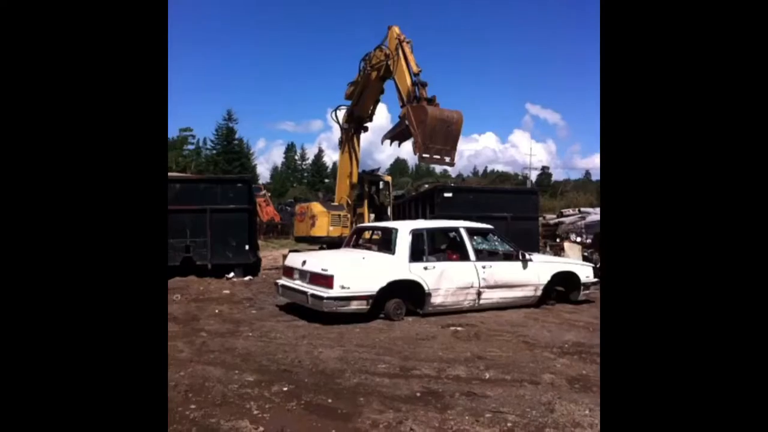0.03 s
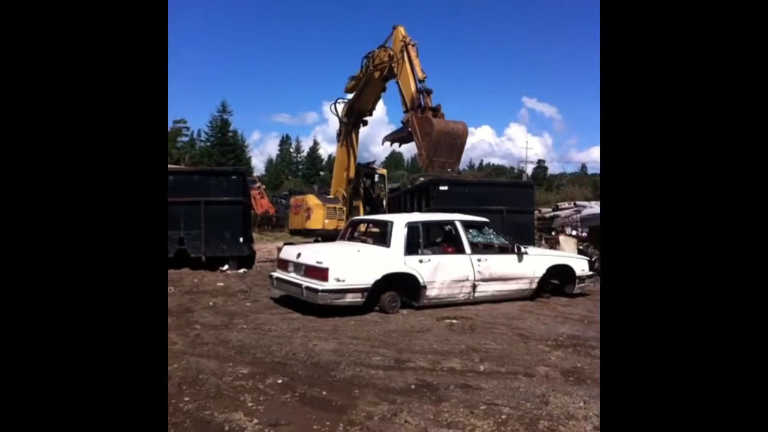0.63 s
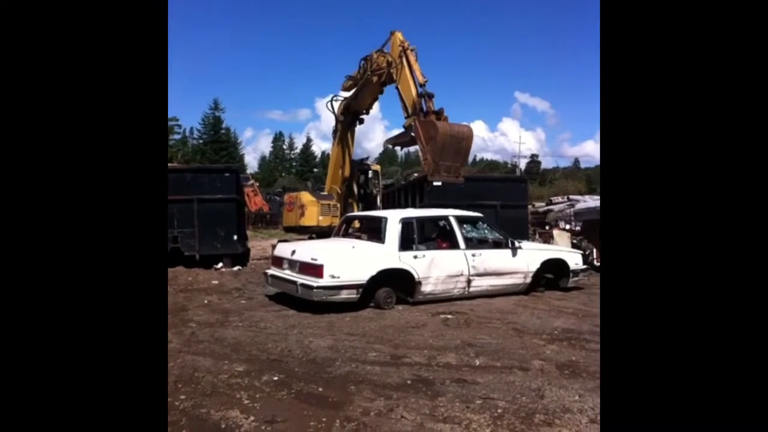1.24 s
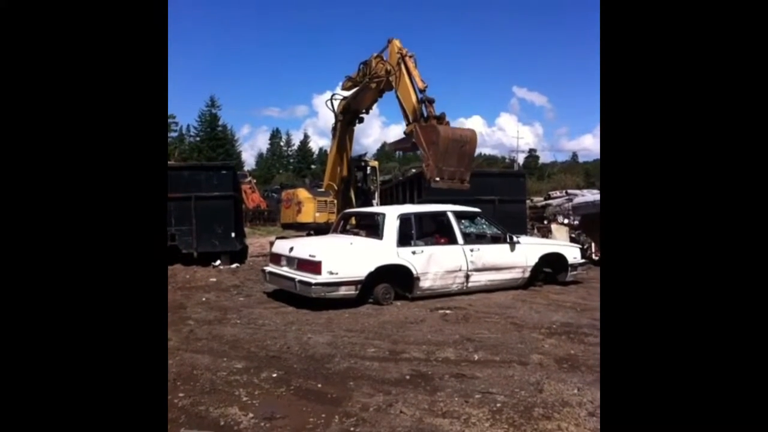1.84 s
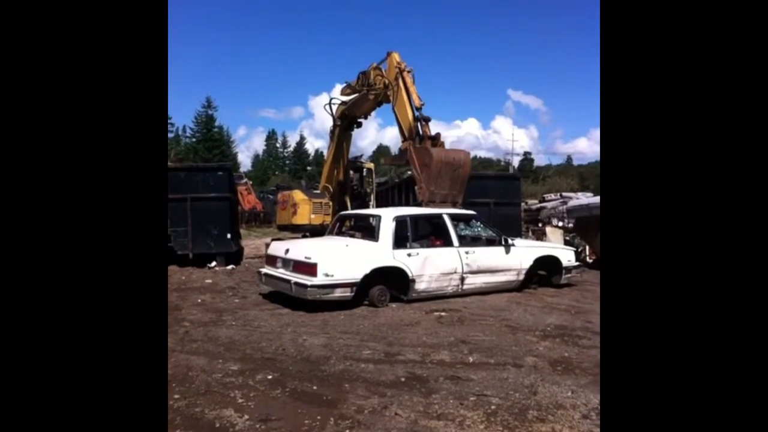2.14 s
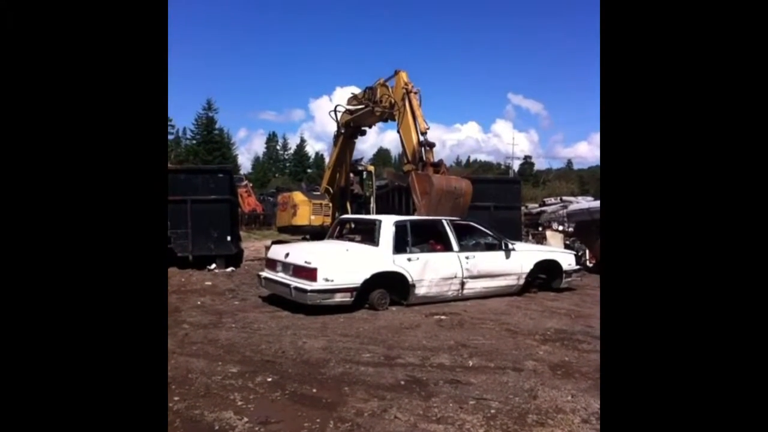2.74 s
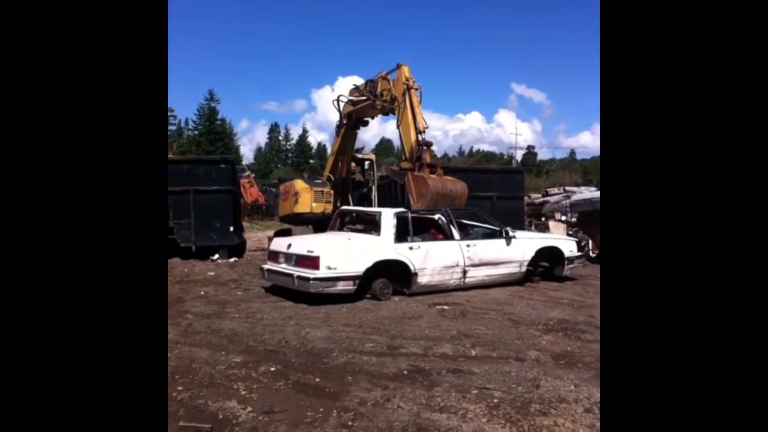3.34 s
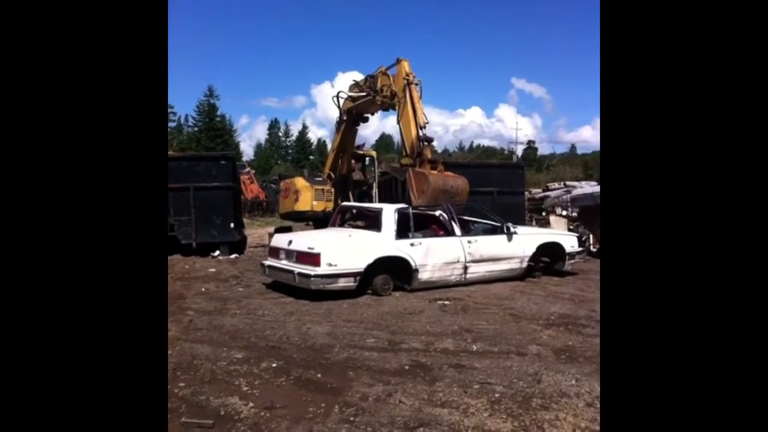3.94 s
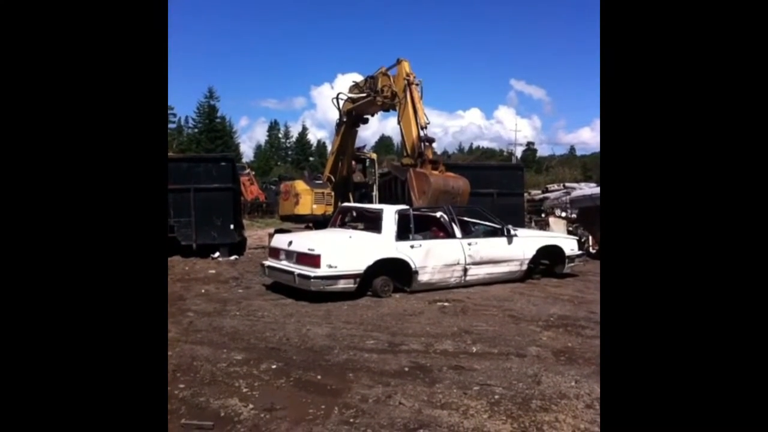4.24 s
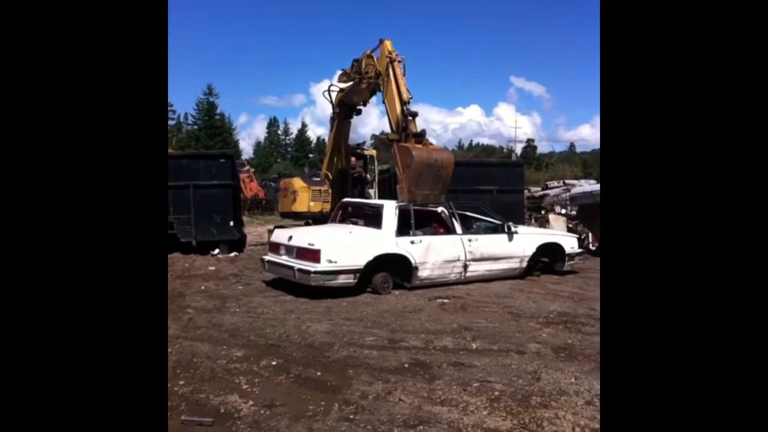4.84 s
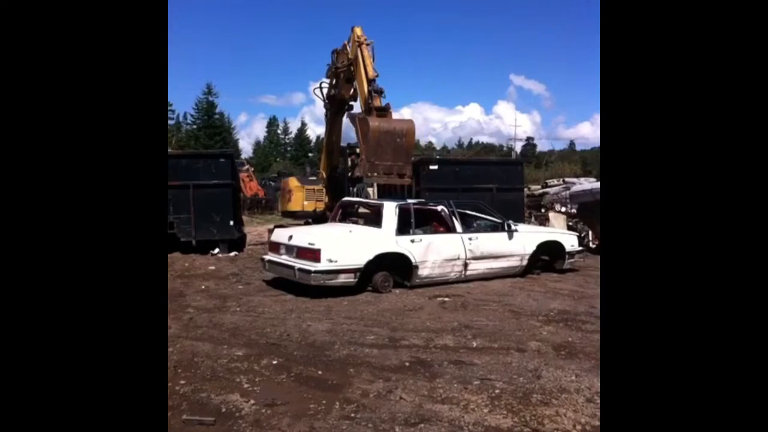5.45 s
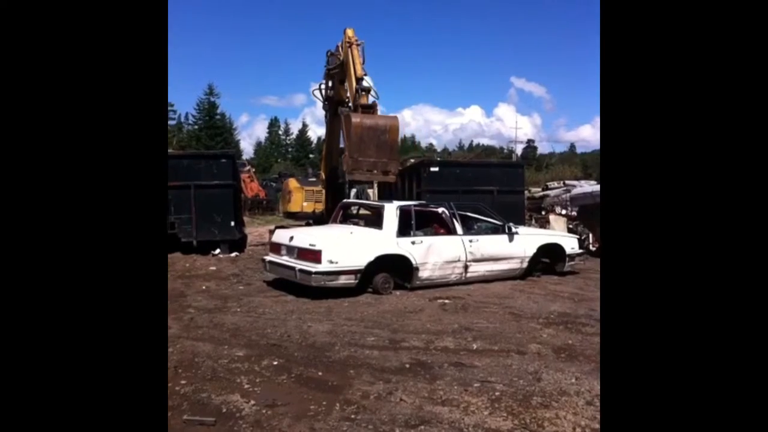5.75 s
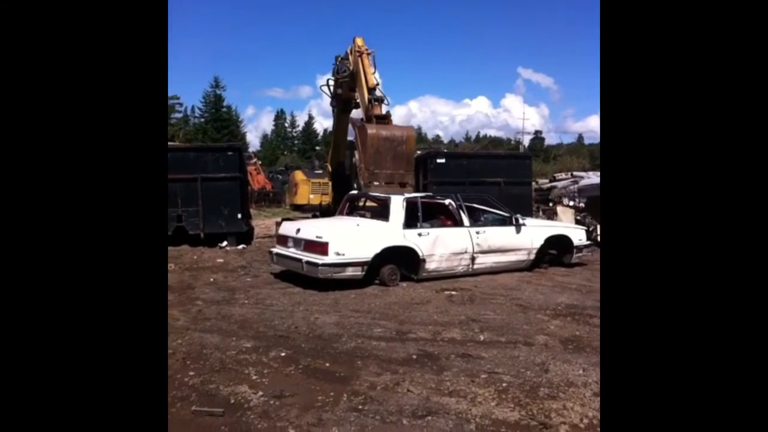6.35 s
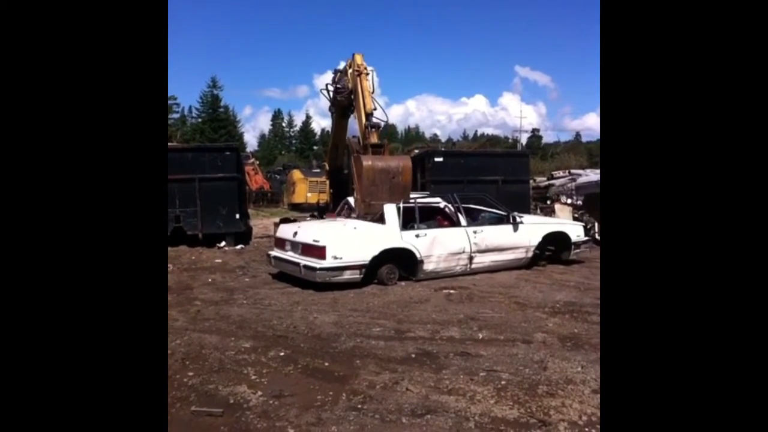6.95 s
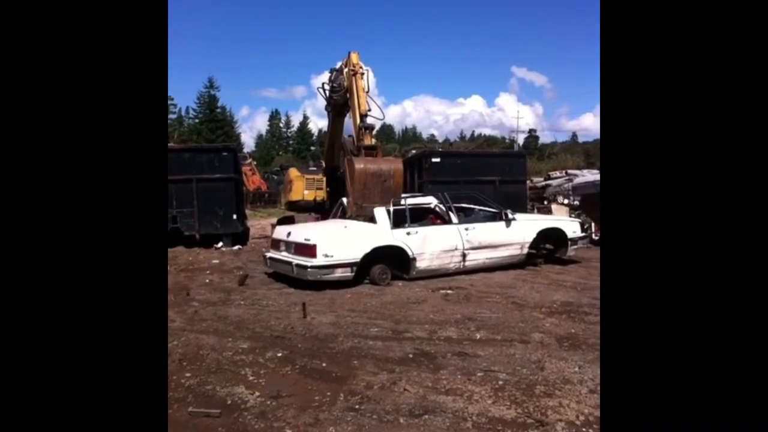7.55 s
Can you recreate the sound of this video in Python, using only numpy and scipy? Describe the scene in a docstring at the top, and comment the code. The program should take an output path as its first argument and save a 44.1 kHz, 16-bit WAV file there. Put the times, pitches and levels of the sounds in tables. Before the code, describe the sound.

Metal crunches, creaks and booms and glass splinters as an excavator bucket presses twice into a car roof, over a steady diesel drone.

```python
"""A diesel drones and hisses: an excavator in a scrap yard, oil whistling thinly in its valves.
Its bucket presses into a car's roof, lifts and presses again. In bursts of tiny slips the sheet buckles
and booms, and trim and glass snap and splinter. Panels creak; the bucket clunks, clanks over a pillar
and scrapes along torn metal. The camera's limiter pulls everything down after the sharpest cracks
and lets it swell back."""
import sys
import numpy as np
from scipy import signal
from scipy.io import wavfile
from scipy.ndimage import uniform_filter1d, minimum_filter1d

SR = 44100
rng = np.random.default_rng(int(sys.argv[2]) if len(sys.argv) > 2 else 0)


def master(y):
    """Save y as 16-bit WAV."""
    cut = np.clip(np.atleast_2d(y).T, -1, 1)
    pcm = np.round(cut * 32767)  # scale
    wavfile.write(sys.argv[1], SR, pcm.astype(np.int16))


N = 335160
TIME = np.arange(N) / SR

# Glass, trim and welds giving way, and at 4.383 s the bucket's bright rasp as it clunks; sheet folding. Both:
# (time [s], peak [dB], thud [dB], splinters [dB], ring [Hz], decay [s], ring [dB])
SNAPS = [(2.215, -11.5, 1, -4, 660, 0.0048, 2), (2.328, -12.5, -20, -3, 670, 0.0033, 10),
         (2.491, -13.5, -16, 16, 735, 0.0037, 0), (2.577, -14.5, 6, 0, 820, 0.0065, 3),
         (2.9255, -9.5, -8, -3, 1480, 0.0025, 6), (2.9567, -10, 2, -2, 1340, 0.004, 2),
         (2.992, -17, -2, -15, 1500, 0.0077, -4), (3.03, -3.5, -7, 3, 1350, 0.0061, 3),
         (3.1094, 0, -15, -4.5, 1530, 0.0031, 3), (3.1796, -9, -29, -17, 1620, 0.0026, 8),
         (3.192, -8, -4.5, -5.5, 1320, 0.0027, -1), (3.3243, 11, -14.5, -0.5, 1590, 0.0022, -2),
         (3.559, -5.5, -5, 1.5, 1370, 0.01, 5), (3.935, -17.5, -12.5, 5, 1380, 0.0064, -1),
         (3.964, -20, -10, 12, 1398, 0.0046, 0), (4.12, -17, -10, 0, 1398, 0.0051, 0),
         (4.383, -17.5, -7, -2.5, 1400, 0.02, -5), (4.421, -29, -15, 17, 1400, 0.012, -3),
         (6.472, -22.5, -7, -3, 696, 0.0038, 15), (6.57, -17.5, -16, -14, 670, 0.003, 16),
         (6.626, -16, 7, -4, 620, 0.002, 12), (6.7072, -16, -16, -8, 2050, 0.0046, -1),
         (6.7698, -9, -16, -3, 2050, 0.0039, 2), (6.847, 1.5, -23, 8, 2440, 0.0046, -5),
         (6.87, -9, -24, 14.5, 1270, 0.023, 3), (6.935, -11, -5, 0, 729, 0.0051, 6),
         (7.3698, -5, -23, 4, 2100, 0.0038, -1)]
BUCKLES = [(2.246, -4, -1, -27, 790, 0.0051, -6), (2.2905, -11.5, -1, -24, 730, 0.014, 1),
           (2.3166, -10, -7, -23, 1290, 0.0063, 5), (2.353, -1.5, -8, -16, 610, 0.01, 2.5),
           (2.37, -9.5, -18, -10, 740, 0.0071, 6), (2.4431, -9, -19, -10, 1720, 0.0065, 11),
           (2.539, -5.5, -3.5, -9, 680, 0.023, -2), (2.7048, -11, -6, -25, 1620, 0.007, 10),
           (2.765, 1.5, 2, -3.5, 1900, 0.0092, -8), (2.7999, -9.5, -9, -17, 1660, 0.0094, 4),
           (2.8525, 0, -2, -8.5, 1520, 0.0061, -5), (4.57, -13, -4, -15, 1420, 0.017, -7),
           (4.641, -5.5, -6, -22, 1850, 0.004, 6), (4.765, -6.5, -8, -14, 1970, 0.007, -14),
           (4.783, -4.5, -11, -23, 1990, 0.008, 3), (4.9004, -14.5, 0, -18, 2120, 0.019, 4),
           (6.8825, -6.5, -21, 1, 2000, 0.0052, 6), (6.905, -11, -12, -10, 1300, 0.01, 2),
           (6.959, -10.5, -10, -27, 706, 0.031, -7), (7.57, -10.5, -6, -9.5, 1670, 0.012, -1)]

def cracks():
    """Brittle parts snap short and bright; sheet metal buckles slower and duller."""
    out = np.zeros(N)
    for time_s, *row in SNAPS:
        add(out, time_s, fracture(*row, rise_s=0.000095, highpass_hz=1140, ring_t60_s=0.016,
                                  shell_db=-18, trim_db=-5, thud_stretch=15, tail_db=-22))
    for time_s, *row in BUCKLES:
        add(out, time_s, fracture(*row, rise_s=0.0012, highpass_hz=150, ring_t60_s=0.039,
                                  shell_db=-5.5, trim_db=0.5, thud_stretch=1, tail_db=-38))
    return out


# Modes of the car's shell; of a trim strip or shard: (frequency [Hz], level [dB], t60 [s])
SHELL_MODES = [(160, -24, .12), (232, -12, .1), (275, -20, 0.079), (388, 6, 0.12), (595.3, 8, 0.23),
               (662, 11, 0.064), (744, 10, 0.11), (844, 8, 0.071), (1160, 10, 0.13), (1337, 5, 0.07),
               (1678, 0.5, 0.089), (1965, 12.5, 0.057), (2206, 9.5, 0.06)]
TRIM_MODES = [(2090, -3.5, 0.034), (2660, -1.5, 0.044), (3100, 1, 0.02), (4265, 4, 0.019),
              (5260, -4.5, .025), (5910, -2.5, 0.027), (6780, -2.5, 0.015), (7430, -6.5, 0.028)]
# Spectra of flexing panels, tearing sheet, splintering glass: (frequency [Hz], gain [dB])
BOOM_SPECTRUM = [(30, -38), (85, -29.5), (150, -2.5), (250, -1), (350, -5), (450, -11), (900, -43.5),
                 (3000, -64)]
TEAR_SPECTRUM = [(100, -19), (350, -27), (620, 9), (850, 7.5), (1020, -1), (1250, 3.5), (1700, 2),
                 (2200, -6.5), (2900, -11.5), (4500, -17), (15000, -73)]
GLASS_SPECTRUM = [(800, -70), (2200, 4), (3300, -6), (4300, 2), (6300, 0.5), (8000, -4), (9300, -2.5),
                  (11000, -6), (15000, -7)]

def fracture(peak_db, thud_db, splinter_db, ring_hz, decay_s, ring_db,
             rise_s, highpass_hz, ring_t60_s, shell_db, trim_db, thud_stretch, tail_db, size=11000):
    """A dying avalanche of slips tears and rings the sheet, shoves a panel and throws splinters."""
    t = np.arange(size) / SR
    slips, shove, chips = rng.choice([-1., 1.], (3, size))
    burst = (1 - np.exp(-t / rise_s)) * (np.exp(-t / decay_s) + amp(tail_db) * np.exp(-t / 0.0038))
    heave = (1 - np.exp(-t / 0.0036)) * np.exp(-t / (thud_stretch * decay_s))
    slips, chips = slips * burst, chips * burst
    torn = unit(highpass(colour(slips, TEAR_SPECTRUM), highpass_hz))  # small pieces radiate little bass
    patch = amp(ring_db) * unit(ring(slips, [(ring_hz, 0, ring_t60_s)]))
    shell = amp(shell_db) * unit(ring(slips, SHELL_MODES))
    piece_modes = [(hz * (1 + 0.044 * rng.uniform(-1.28, 1)), db, t60) for hz, db, t60 in TRIM_MODES]
    trim = amp(trim_db) * unit(ring(chips, piece_modes))
    splinters = amp(splinter_db) * unit(unit(colour(chips, GLASS_SPECTRUM)) + trim)
    thud = amp(thud_db) * unit(colour(shove * heave, BOOM_SPECTRUM))
    return at_peak(unit(torn + patch + shell) + thud + splinters, peak_db)


# Arm strokes: (start [s], length [s], rise [s], boom [dB], crumpling [dB], glass [dB])
STROKES = [(2.215, 0.26, 0.022, -30.5, -24, -34.5), (2.261, 0.056, 0.0099, -17.5, -23, -48),
           (2.44, 0.3, 0.025, -30.5, -28, -37), (2.768, 0.17, 0.024, -27.5, -26, -34),
           (2.962, 0.21, 0.016, -31.5, -26, -30.5), (3.234, 0.094, 0.058, -46, -42, -32.5),
           (3.348, 0.38, 0.022, -35, -38, -39), (3.946, 0.19, 0.042, -33, -40, -41.5),
           (4.536, 0.29, 0.015, -27, -24.5, -40.5), (6.464, 0.38, 0.086, -40, -35.5, -42),
           (6.787, 0.093, 0.055, -27, -27.5, -27), (6.968, 0.28, 0.022, -28, -29.5, -34),
           (7.406, 0.28, 0.025, -35.5, -34.5, -39.5)]
# Crumbs after a 0 dB crack, for panels, sheet and glass: (level [dB], decay [s])
CRUMBS = [(-21, 0.05), (-25, 0.027), (-28, 0.046)]

def grinding_gains(swell_db_per_s=6, release_db_per_s=120, reference_decay_s=0.0083):
    """Pressure builds, swells slowly while held and drops fast when let go; longer cracks shed more crumbs."""
    power = np.zeros((3, N))
    for start_s, length_s, rise_s, *levels_db in STROKES:
        t = TIME - start_s
        fall_db = swell_db_per_s * np.maximum(t, 0) - release_db_per_s * np.maximum(t - length_s, 0)
        effort = np.clip(t / rise_s, 0, 1) * amp(fall_db)
        power += (amp(levels_db)[:, None] * effort) ** 2
    t = np.arange(SR // 2) / SR
    for time_s, peak_db, thud_db, splinter_db, _, decay_s, _ in SNAPS + BUCKLES:
        for layer, share_db, (crumb_db, fade_s) in zip(power, (thud_db, 0, splinter_db), CRUMBS):
            gain = amp(peak_db + share_db + crumb_db) * decay_s / reference_decay_s
            add(layer, time_s, (gain * np.exp(-t / fade_s)) ** 2)
    return np.sqrt(power)


def crushing(shell_db=-4, uneven_db=0.4, spray_db=-7, spray_s=0.0049):
    """Small slips stream through the panels, the creasing sheet and the crazed glass."""
    boom_gain, crumple_gain, glass_gain = grinding_gains()
    creases = grains(per_s=1500, spread_db=2)
    shell = amp(shell_db) * unit(ring(creases, SHELL_MODES[4:]))
    metal = unit(unit(colour(creases, TEAR_SPECTRUM)) + shell)
    panels = unit(colour(rng.standard_normal(N), BOOM_SPECTRUM))
    splinters = unit(colour(grains(per_s=10000, spread_db=-4), GLASS_SPECTRUM) * amp(0.43 * drift(170)))
    # Larger shards release short sprays.
    shards = abs(grains(per_s=52, spread_db=5.5))
    sprays = signal.lfilter([1], [1, -np.exp(-1 / (spray_s * SR))], shards)
    splinters = unit(splinters * (1 + amp(spray_db) * unit(sprays)))
    return (panels * boom_gain + metal * crumple_gain + splinters * glass_gain) * amp(uneven_db * drift(25))


# Groans and squeals: (centre [s], length [s], level [dB], pitch [Hz], wobble [ratio], glide [octaves])
CREAKS = [(0.316, 0.1, -34, 345.5, 0.14, -0.023), (2.256, 0.043, -17.5, 203, 0.15, 0.11),
          (2.3, 0.089, -22, 162.7, 0.07, -0.019), (2.303, 0.049, -19, 723, 0.09, 0.11),
          (2.37, .04, -21, 623, 0, 0.02), (2.36, 0.022, -16, 1124, 0, -0.18),
          (2.777, 0.03, -14, 284, 0, -0.37), (2.843, 0.021, -13.5, 254, 0.06, 0),
          (2.864, 0.02, -7.5, 314, .03, -0.13), (4.55, .016, -33, 6660, .03, -0.088),
          (4.645, .014, -15, 1860, 0, -0.08), (4.79, 0.043, -23, 2090, 0.1, -0.12),
          (6.597, 0.11, -28, 228, 0.13, 0.046), (6.821, .028, -21.5, 291, 0, 0.092),
          (6.844, 0.0243, -26, 750, .08, 0.24), (6.847, 0.039, -22.5, 1140, 0.05, 0.22),
          (6.873, .03, -23, 1400, .05, 0.2), (6.887, 0.013, -8.5, 1243, 0.02, 0.055),
          (6.905, 0.01, -17, 1280, 0.14, -0.062), (6.918, 0.01, -21, 1260, 0.08, -0.069),
          (7.193, 0.077, -21, 211, 0.11, -0.14)]

def creaks(rough_db=3, slips_per_cycle=0.33):
    """Stick-slip tones glide with the tension; pitch and strength shift with every slip."""
    out = np.zeros(N)
    for centre_s, length_s, db, hz, wobble, glide_octaves in CREAKS:
        active = abs(TIME - centre_s) < length_s / 2
        t = TIME[active] - centre_s
        slip_count = (t + length_s / 2) * hz * slips_per_cycle
        bend, grip = (np.interp(slip_count, np.arange(512), k) for k in rng.standard_normal((2, 512)))
        pitch_hz = hz * 2 ** (glide_octaves * t / length_s) * (1 + wobble * bend)
        tone = amp(rough_db * grip) * np.sin(2 * np.pi * np.cumsum(pitch_hz) / SR)
        out[active] += amp(db) * unit(tone) * np.cos(np.pi * t / length_s)
    return out


# Teeth skipping over a pillar; arm slack knocking the bucket: (time [s], peak [dB], decay [s])
CLANKS = [(7.1359, -7, 0.0018), (7.2222, -6.5, 0.0051), (7.2328, -4, 0.0019), (7.2583, -5, 0.0031)]
CLUNKS = [(1.56, -25, 0.062), (4.388, -6, 0.01), (4.399, -3, 0.016), (4.781, -31, 0.021),
          (5.64, -29, 0.033), (5.74, -22.5, 0.027), (6.598, -15.5, 0.0076)]
# Modes of the pillar; of the hollow bucket: (frequency [Hz], level [dB], t60 [s])
PILLAR_MODES = [(1790, 7.5, 0.019), (2134, 10, 0.03), (2700, -5, 0.017), (4130, -1, 0.024),
                (5400, -10, .012), (6030, -3, 0.02), (7760, -20, 0.014)]
BUCKET_MODES = [(270, -18, 0.091), (358, 5, 0.11), (480, 2.5, 0.078), (580, 9.5, 0.063), (830, 3, 0.12),
                (896, 4, 0.061), (990, -1.5, 0.035), (1120, 7, 0.088), (1233, 2, 0.053), (1346, 9, 0.03),
                (1480, -7, 0.036), (1730, -4, 0.06), (1890, -3, 0.06), (2160, -16, 0.055)]

def blows(rows, modes, rise_s, rasp_db, thud_db=-17, size=11000):
    """Steel chatters briefly on steel, rings the struck part and shoves its walls."""
    t, out = np.arange(size) / SR, np.zeros(N)
    for time_s, peak_db, decay_s in rows:
        chatter = rng.standard_normal(size) * (1 - np.exp(-t / rise_s)) * np.exp(-t / decay_s)
        rasp = amp(rasp_db) * unit(colour(chatter, TEAR_SPECTRUM))
        thud = amp(thud_db) * unit(colour(chatter, BOOM_SPECTRUM))
        add(out, time_s, at_peak(unit(ring(chatter, modes)) + rasp + thud, peak_db))
    return out


# Lip drags: (start [s], length [s], rise [s], level [dB], pitch [ratio], tilt [dB/octave])
SCRAPES = [(2.384, 0.044, 0.0075, -22, 1.0, -2), (2.647, 0.071, 0.012, -24, 1.02, 0.5),
           (4.605, 0.047, 0.021, -22, .9, -1), (4.71, 0.04, .005, -28.5, .99, 7),
           (4.765, 0.039, .015, -18.5, 1.0, -5.5), (6.966, 0.019, .008, -24, .76, -3)]
# Modes of the torn edge: (frequency [Hz], level [dB], t60 [s])
EDGE_MODES = [(1415, 1, 0.02), (1740, 1, 0.024), (2030, -5.5, 0.067), (2240, -9, 0.033), (2950, -7, 0.016),
              (3590, -7, 0.031), (4300, -7.5, 0.027), (5600, -9, 0.022)]

def scrapes(release_db_per_s=700, wobble=0.0393, size=11000):
    """The bucket's lip judders along a torn edge and rings it; the pitch wobbles with the tension."""
    t, out = np.arange(size) / SR, np.zeros(N)
    slips, tension = grains(per_s=2500, spread_db=3), drift(160)
    for start_s, length_s, rise_s, db, pitch, tilt_db in SCRAPES:
        span = slice(round(start_s * SR), round(start_s * SR) + size)
        modes = [(hz * pitch, mode_db + tilt_db * np.log2(hz), t60) for hz, mode_db, t60 in EDGE_MODES]
        judder = np.clip(1 + wobble * tension[span], .5, 2)
        screech = np.interp(np.cumsum(judder), np.arange(size), unit(ring(slips[span], modes)))
        envelope = np.minimum(t / rise_s, 1) * amp(db - release_db_per_s * np.maximum(t - length_s, 0))
        add(out, start_s, screech * envelope)
    return out


# Governed speed: (time [s], firing rate [Hz])
FIRING_RATE = [(0, 61), (.45, 61.3), (.8, 60.4), (1.25, 60), (2, 60.8), (2.5, 61.3), (3, 59.7), (3.5, 60.3),
               (3.75, 60.9), (4.1, 60.2), (5.25, 60.45), (6.1, 60.05), (6.6, 60.9), (7, 60), (7.6, 60.1)]
# Engine load: (time [s], exhaust gain [dB], clatter, knock and hiss gain [dB])
ENGINE_LOAD = [(0, -5, 0.5), (.6, -2.5, -0.5), (1.2, -1, 0), (2.1, -3.5, -1), (2.7, 0.5, -1.5), (3.5, 4, 7),
               (4.2, 6.5, 7), (5, 1.5, 0.5), (6.2, -0.5, -1), (6.9, -0.5, 2.5), (7.6, -4, 0.5)]
# Spectra of block clatter and cooling fan: (frequency [Hz], gain [dB])
CLATTER_SPECTRUM = [(30, -52.5), (80, -21), (105, -23), (135, -6), (270, -4.5), (340, -9), (490, -17),
                    (650, -8.5), (1030, -18), (1330, -12), (1650, -13.5), (1900, -15.5), (2150, -14),
                    (2900, -31), (4000, -41)]
FAN_SPECTRUM = [(1500, -62), (3100, -18.5), (3500, -11.5), (4200, -2.5), (4700, -7.5), (6300, -9.5),
                (7750, -16.5), (9000, -10), (10200, -16), (11100, -16.5), (11700, -17), (12250, -29),
                (13200, -15), (15000, -20)]

def engine(clatter_db=-31, hiss_db=-46.5, repeat_power=0.33, throb=0.02, hunt_hz=.22, size=2940):
    """Four-cylinder diesel: exhaust tones, knocks, clatter that partly repeats each cycle, fan hiss."""
    cycles = np.cumsum(curves(FIRING_RATE)[0] + hunt_hz * drift(9)) / SR / 4
    exhaust_db, load_db = curves(ENGINE_LOAD)
    gears = highpass(np.interp(cycles % 1 * size, np.arange(size), rng.standard_normal(size)), hz=500)
    drive = rng.standard_normal(N) + np.sqrt(repeat_power) * gears
    clatter = unit(colour(drive * pulsation(cycles, depth=0.033), CLATTER_SPECTRUM))
    clatter *= amp(clatter_db + .5 * drift(7.1))
    # The rumble chugs with the strongest cylinder.
    rumble = signal.sosfiltfilt(signal.butter(2, 420, fs=SR, output="sos"), clatter)
    clatter += rumble * throb * (np.cos(2 * np.pi * cycles) - .5)
    hiss = unit(colour(rng.standard_normal(N) * pulsation(cycles, depth=0.07), FAN_SPECTRUM))
    hiss *= amp(hiss_db + .5 * drift(12))
    return exhaust(cycles) * amp(exhaust_db) + (clatter + knocks(cycles) + hiss) * amp(load_db)


def pulsation(cycles, depth):
    """Gain over the engine cycle: four firings, one strong cylinder, nine pump pistons."""
    firings = unit(np.exp(-(cycles * 4 % 1) / 0.56) - .29)
    strong_cylinder = np.cos(2 * np.pi * cycles)
    pistons = np.cos(2 * np.pi * 9 * cycles)
    return unit(np.exp(depth * (firings + strong_cylinder + pistons)))


# Exhaust and pump gear tones: (frequency [multiples of the cycle rate])
ORDERS = (4, 8, 9, 11, 12, 15, 16, 17, 18, 20, 24, 30, 36, 46, 85, 94, 104, 116, 142)
# Per tone: (level before the swing [dB], level after [dB])
ORDER_LEVELS = [(-57.5, -60), (-34, -35), (-60, -47.5), (-51, -48.5), (-34.5, -37), (-60.5, -42),
                (-39.5, -42.5), (-33.5, -42.5), (-40, -35.5), (-39, -51), (-92, -46), (-49, -68),
                (-44.5, -49), (-60, -44.5), (-41.5, -54), (-52, -48.5), (-49, -48), (-44.5, -45),
                (-53, -49)]
# The machine swinging round: (time [s], share [0-1])
SWING = [(2.2, 0), (4.3, 0.75), (6.4, 1), (7.6, 0.3)]

def exhaust(cycles, waver_db=0.5):
    """Crank-locked tones; uneven cylinders fill in the orders between the firing harmonics."""
    swing, = curves(SWING)
    out = np.zeros(N)
    for order, (before_db, after_db) in zip(ORDERS, ORDER_LEVELS):
        phase = 2 * np.pi * order * cycles + rng.uniform(-.7, .7) + .09 * drift(14)
        out += amp(before_db + (after_db - before_db) * swing + waver_db * drift(4.2)) * np.cos(phase)
    return np.sqrt(2) * out


# Fuel knock and closing valves: (place in the cycle [0-1], level [dB])
KNOCKS = [(.05, -2), (.15, -3), (.24, -3), (.47, -2.5), (0.709, -2), (.94, -5.5)]
# Modes of the engine block: (frequency [Hz], level [dB], t60 [s])
BLOCK_MODES = [(696, -2.5, 0.029), (1296, -1, 0.026), (1423, 1.5, 0.023), (1600, -6.5, 0.022),
               (2120, -4, 0.028)]

def knocks(cycles, level_db=-37, uneven_db=2, slop_cycles=.007):
    """Sharp taps near set crank angles ring the block, each a little different."""
    taps = np.zeros(N)
    for place, db in KNOCKS:
        struck = np.diff(np.floor(cycles - place + slop_cycles * drift(15)), append=0) > 0
        taps += struck * amp(db + uneven_db * drift(15))
    return amp(level_db) * unit(ring(taps, BLOCK_MODES))


# Oil valve whistles: (frequency [Hz], level [dB], t60 [s])
VALVE_MODES = [(2763, 4, 0.049), (3777, 1, 0.042), (4170, 3, 0.04), (5270, -2, 0.042), (6480, -6, 0.04),
               (8730, -2, 0.02), (9000, -2.5, 0.04), (10470, -9, .035), (11900, -8, 0.026),
               (13100, -14, .02), (14020, -10, .02)]

def hydraulics(level_db=-51.3, waver_db=3):
    """Turbulent oil rings the valves; each whistle comes and goes with the flow."""
    whistles = sum(ring(rng.standard_normal(N), [mode]) * amp(waver_db * drift(4.47))
                   for mode in VALVE_MODES)
    return amp(level_db) * unit(whistles)


def yard(x, scatter_db=-20, t60_s=0.16, slap_s=0.01, slap_db=-17, size=16000):
    """One slap off nearby steel, plus dull scatter from the ground, skips and scrap piles."""
    t = np.arange(size) / SR
    taps = rng.standard_normal(size) * (rng.random(size) < .04) * (t > .005)
    taps = colour(taps * np.exp(-np.log(1000) * t / t60_s), [(200, 0), (2000, 0), (6000, -8), (15000, -15)])
    out = x + amp(scatter_db) * signal.oaconvolve(x, taps / np.linalg.norm(taps))[:N]
    add(out, slap_s, amp(slap_db) * x)
    return out


def amp(db):
    """Decibels to gain."""
    return 10 ** (np.asarray(db) / 20)


def unit(x):
    """Scales to rms 1."""
    return x / np.sqrt(np.mean(x ** 2) + 1e-20)


def outline(x):
    """Peak envelope: twice the rms over 3 ms."""
    return 2 * np.sqrt(abs(uniform_filter1d(x ** 2, 130)) + 1e-18)


def at_peak(x, db):
    """Scales the top of the outline to db."""
    return amp(db) * x / outline(x).max()


def curves(rows):
    """Table columns interpolated over time."""
    times_s, *columns = np.transpose(rows)
    return [np.interp(TIME, times_s, column) for column in columns]


def add(mix, time_s, sound):
    """Mixes a sound in at time_s."""
    part = mix[round(time_s * SR):][:len(sound)]
    part += sound[:len(part)]


def highpass(x, hz, order=2):
    """Cuts below hz."""
    return signal.sosfilt(signal.butter(order, hz, "high", fs=SR, output="sos"), x)


def colour(x, spectrum, size=4096):
    """Minimum-phase filter through (frequency [Hz], gain [dB]) points."""
    hz, db = np.transpose(spectrum)
    bins_hz = abs(np.fft.fftfreq(size, 1 / SR)) + 1
    log_gain = np.log(amp(np.interp(np.log(bins_hz), np.log(hz), db)))
    taps = np.fft.ifft(np.exp(np.conj(signal.hilbert(log_gain)))).real
    return signal.oaconvolve(x, taps[:size // 2])[:len(x)]


def ring(x, modes, size=8192):
    """Drives damped sines with x; nothing below about 150 Hz rings."""
    t = np.arange(size) / SR
    response = sum(amp(db) * np.exp(-np.log(1000) * t / t60) * np.sin(2 * np.pi * hz * t)
                   for hz, db, t60 in modes)
    return signal.oaconvolve(x, highpass(response, hz=150, order=4))[:len(x)]


def drift(per_s, size=32768):
    """Random wander of rms 1 with per_s points a second."""
    return unit(np.interp(TIME * per_s, np.arange(size), rng.standard_normal(size)))


def grains(per_s, spread_db):
    """Random tiny slips of uneven size."""
    strength = amp(spread_db * np.minimum(rng.exponential(1, N), 3.5))
    return strength * rng.choice([-1, 1], N) * (rng.random(N) < per_s / SR)


def scene():
    """The machine, and the crushed car echoing in the yard; mono."""
    clanks = blows(CLANKS, PILLAR_MODES, rise_s=0.0002, rasp_db=-12.5)
    clunks = blows(CLUNKS, BUCKET_MODES, rise_s=0.0018, rasp_db=-13)
    machine = engine() + hydraulics()
    car = cracks() + crushing() + creaks() + scrapes() + clanks + clunks
    return (machine + yard(car))[None]


def record(dry, ceiling_db=-4, hold_s=0.37, recover_db_per_s=9, start_s=.062, lowpass_hz=15380):
    """The limiter drops at once, holds and recovers slowly; then lopsided clipping and a band limit."""
    over_db = np.maximum(20 * np.log10(outline(dry[0])) - ceiling_db, 0)
    half_hold = int(hold_s * SR) // 2
    held_db = -minimum_filter1d(-over_db, 2 * half_hold + 1, origin=half_hold, mode="constant")
    recovery_db = recover_db_per_s * TIME
    duck_db = uniform_filter1d(np.maximum.accumulate(held_db + recovery_db) - recovery_db, 45)
    fade_in = np.clip((TIME - start_s) / .002, 0, 1)
    clipped = np.clip(dry * amp(-duck_db), -.62, .68) * fade_in
    lowpass = signal.firwin(301, lowpass_hz, window=("kaiser", 8), fs=SR)
    return signal.oaconvolve(clipped, lowpass[None], "same")


dry = scene()
out = record(dry)
master(out)
```